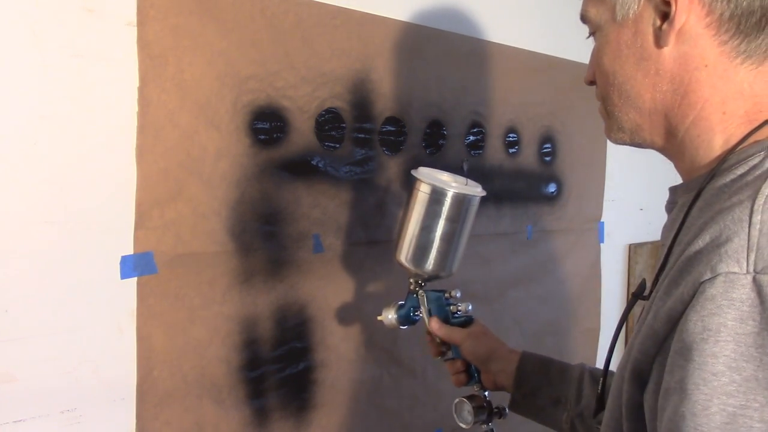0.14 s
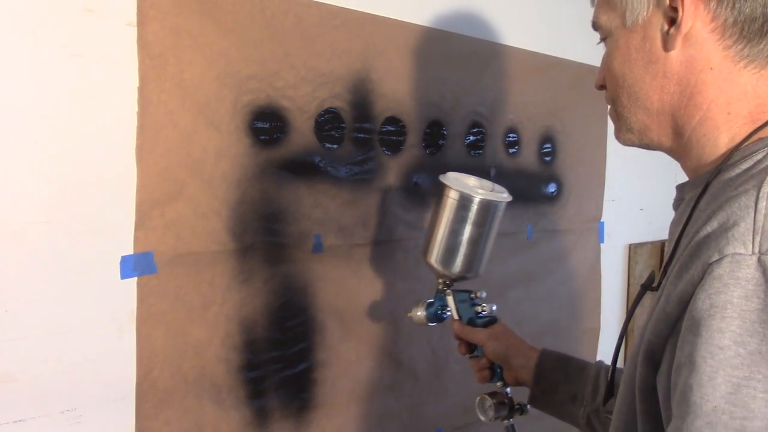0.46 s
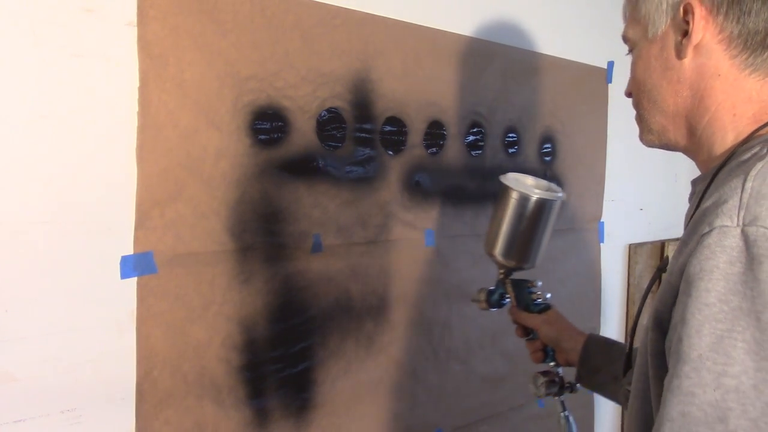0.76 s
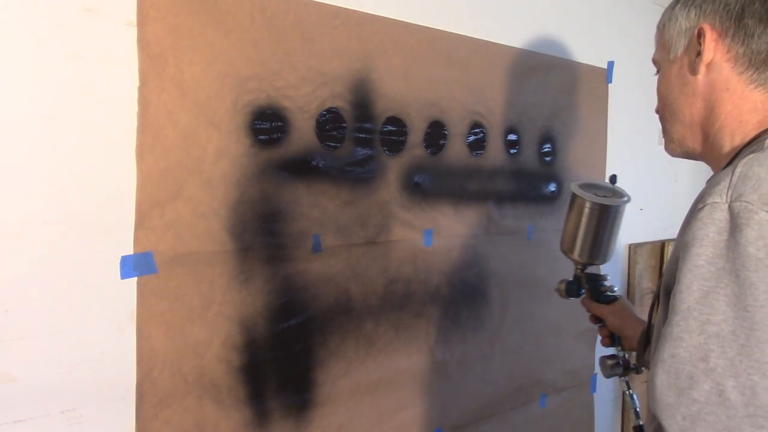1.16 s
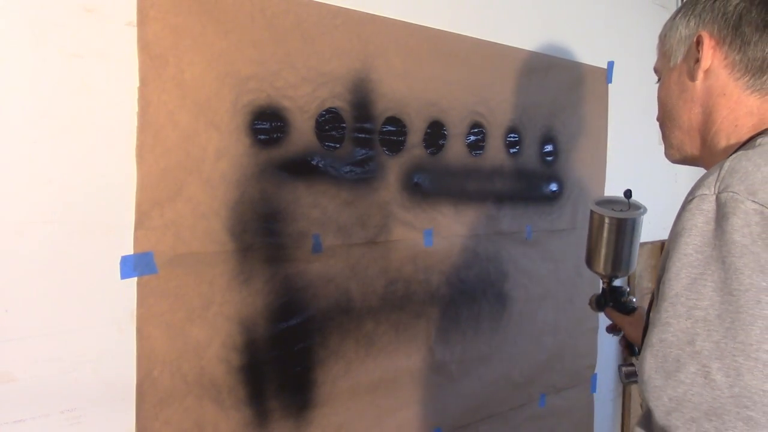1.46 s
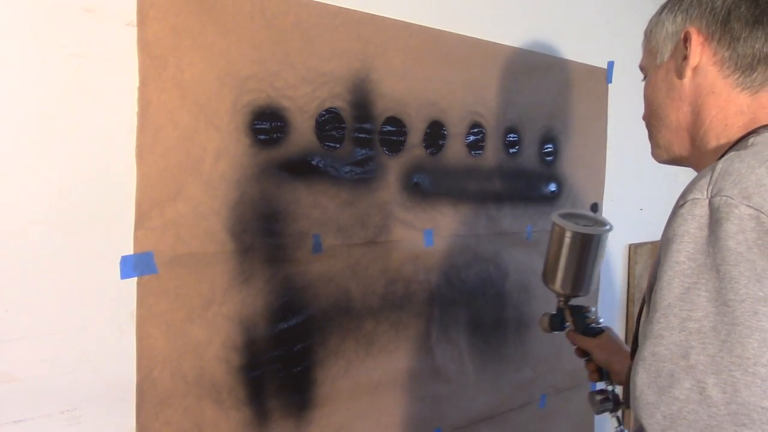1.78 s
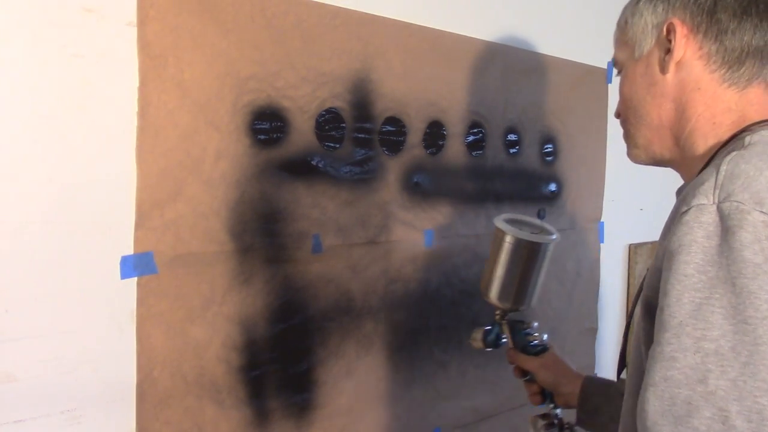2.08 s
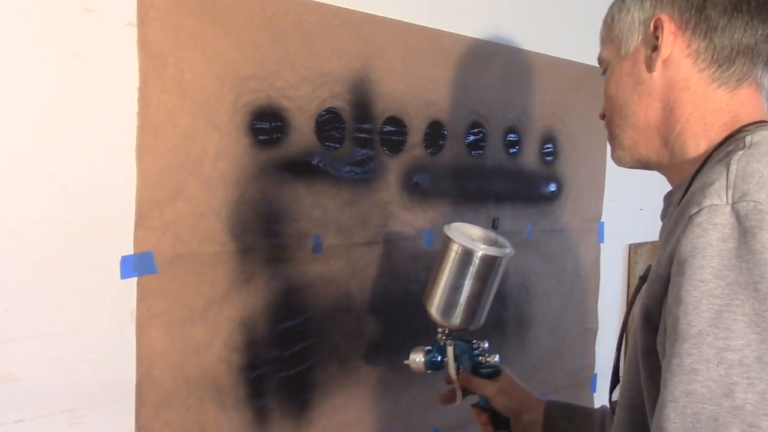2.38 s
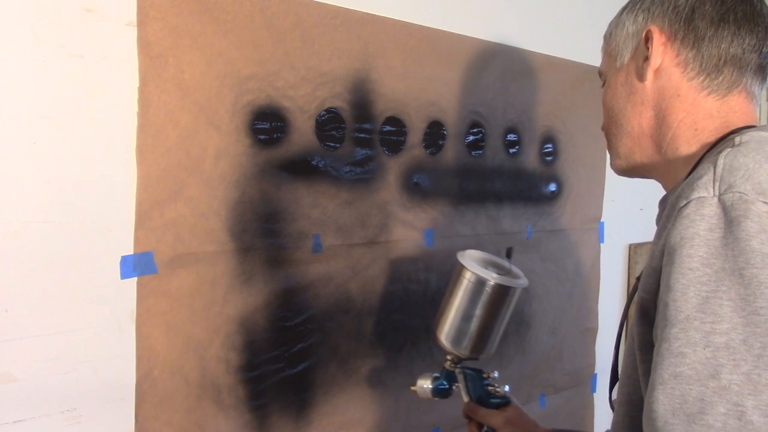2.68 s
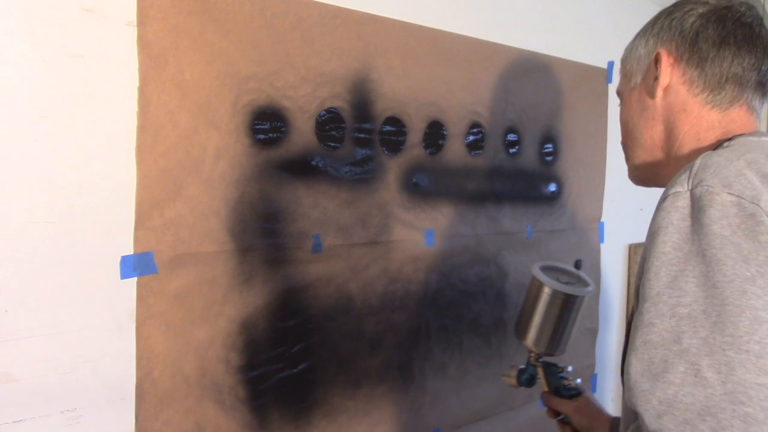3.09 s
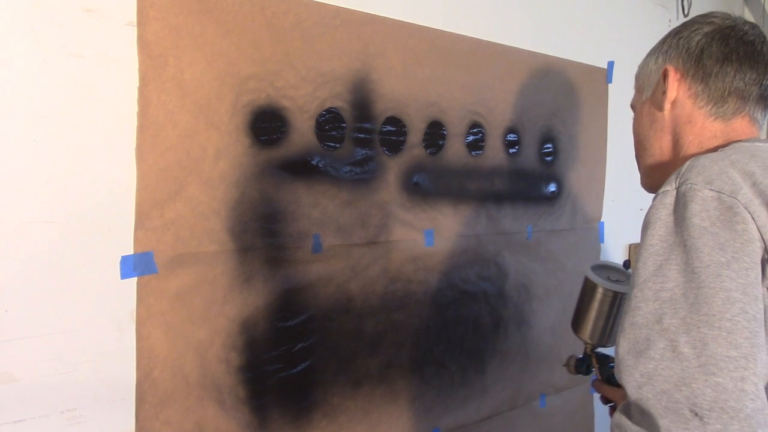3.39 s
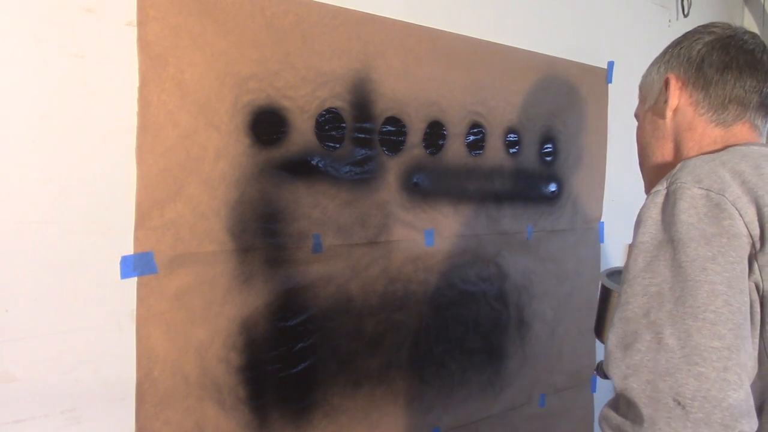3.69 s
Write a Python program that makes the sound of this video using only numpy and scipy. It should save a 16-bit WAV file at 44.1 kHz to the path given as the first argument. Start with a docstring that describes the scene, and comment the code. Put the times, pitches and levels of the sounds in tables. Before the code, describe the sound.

A compressed-air spray gun hisses loudly in three passes with short pauses and trigger clicks.

```python
"""Spray gun in a garage.

A compressed-air gun makes three passes over a paper-covered wall. The trigger clicks, the valve
opens with a spurt of stored air, and the turbulent jet hisses while the paper roars faintly.
The hose thumps dully at each release and at the first two openings; the hiss dies away in the room."""
import sys
import numpy as np
from scipy import signal
from scipy.fft import rfft, irfft
from scipy.io import wavfile
from scipy.ndimage import uniform_filter1d, map_coordinates

SR = 44100
rng = np.random.default_rng(int(sys.argv[2]) if len(sys.argv) > 2 else 0)


def wrap_up_sound(samples):
    """Save the sound to the file named by the first command line argument, as 16-bit audio."""
    columns = np.atleast_2d(samples).T
    # keep every value between -1 and 1, then stretch to whole-number steps
    tamed = np.clip(columns, -1, 1)
    steps = np.round(tamed * 32767).astype(np.int16)
    wavfile.write(sys.argv[1], SR, steps)


N = 169785
TIME = np.arange(N) / SR


def amp(db):
    """Decibels to amplitude ratio."""
    return 10 ** (np.asarray(db) / 20)


def unit_rms(x):
    """Normalisation to rms 1."""
    return x / np.sqrt(np.mean(x ** 2) + 1e-20)


def at_frequency(points, hz):
    """Interpolation on a log-frequency axis."""
    f, value = np.transpose(points)
    return np.interp(np.log(hz + 1), np.log(f + 1), value)


def at_time(points, t, column=1):
    """Linear interpolation in time."""
    columns = np.transpose(points)
    return np.interp(t, columns[0], columns[column])


def colour(x, points):
    """Zero-phase filtering by rows of frequency in Hz and gain in dB."""
    size = 2 * len(x)
    gain = amp(at_frequency(points, np.fft.rfftfreq(size, 1 / SR)))
    return irfft(rfft(x, size) * gain)[:len(x)]


def add(mix, start_s, sound):
    """Superposition of a sound on the mix."""
    part = mix[max(round(start_s * SR), 0):][:len(sound)]
    part += sound[:len(part)]


def resonance(size, hz, half_width_hz):
    """Random excitation of one resonance, rms 1."""
    f = np.fft.rfftfreq(size, 1 / SR)
    response = np.minimum(f / hz, 1) / (1 + ((f - hz) / half_width_hz) ** 2)
    return unit_rms(irfft(rfft(rng.standard_normal(size)) * response, size))


def smooth_field(shape, bins, frames):
    """A moving average correlates noise over frequency and time, rms 1."""
    across_bins = uniform_filter1d(rng.standard_normal(shape), bins, axis=0)
    return unit_rms(uniform_filter1d(across_bins, frames, axis=1))


# Each row: frequency in Hz, relative spectral density in dB.
ROOM_SPECTRUM = [(30, -8), (70, -20), (120, -9.5), (250, -1.5), (400, 0), (700, -6), (1600, -5.5),
                 (3500, -16), (8000, -24), (15000, -31)]
def room_tone(level_db=-49):
    """Stationary noise forms a low, quiet background."""
    return amp(level_db) * unit_rms(colour(rng.standard_normal(N), ROOM_SPECTRUM))


# Each row: frequency in Hz, reverberation time (60 dB of decay) in seconds.
GARAGE_T60 = [(150, 0.53), (400, 1), (1000, 0.76), (3000, 0.87), (6000, 0.63), (10000, 0.46), (15000, 0.36)]
def garage(x, first_s=.005):
    """Reverberation: random reflections decay exponentially, each band at its own rate."""
    taps = rng.choice([-1., 1.], SR) * (rng.random(SR) < .1) * (np.arange(SR) > first_s * SR)
    hz, t, spectra = signal.stft(taps, SR, nperseg=256)
    decay = amp(-60 * t / at_frequency(GARAGE_T60, hz)[:, None])
    tail = signal.istft(spectra * decay, SR, nperseg=256)[1]
    return signal.fftconvolve(x, tail / np.linalg.norm(tail))[:N]


def moving_room(x, tails=4, fades_per_s=10):
    """A room's response depends on source position: the moving gun crossfades between tails."""
    turn = TIME * fades_per_s % tails
    distances = [np.minimum(abs(turn - k), tails - abs(turn - k)) for k in range(tails)]
    return sum(garage(x * np.cos(np.pi / 2 * np.minimum(d, 1))) for d in distances)


# Each row: time in seconds, excess of the path via the wall over the direct path in metres.
WALL_PATH = [(.2, 0.51), (.6, 0.39), (1.2, 0.29), (1.6, 0.32), (2.0, .32), (2.45, 0.406), (2.75, 0.46),
             (3.05, 0.35), (3.6, 0.27)]
def wall_echoes(x, near_gain=.085, far_gain=.094, far_extra_m=.57, sound_m_per_s=343):
    """Comb filtering: the direct sound interferes with two echoes that shift as the gun moves."""
    path = at_time(WALL_PATH, TIME)
    near, far = (map_coordinates(x, [(TIME - metres / sound_m_per_s) * SR], order=3)
                 for metres in (path, path + far_extra_m))
    return x + near_gain * near + far_gain * far


def paper(level_db=-39.5, db_per_m=19, wait_s=.051):
    """Forced vibration: paper roars hollowly once paint lands, swelling and fading as the gun moves."""
    landed = np.minimum(np.minimum(airflow(TIME), airflow(TIME - wait_s)), 1)
    path = at_time(WALL_PATH, TIME)
    gain = amp(level_db + db_per_m * (path - path.mean()))
    return gain * landed * resonance(N, hz=618, half_width_hz=85)


# Each row: start in seconds, peak level in dB, level of the bounce relative to that peak in dB.
HOSE_THUMPS = [(0.213, -29, 1), (1.343, -22.5, 4), (1.563, -32, -1), (2.478, -20, -3), (3.606, -22, 1)]
def hose(band_hz=(115, 350), bounce_s=.0115):
    """Pressure surge: at each listed change of flow a dull pulse runs along the hose, reflected once."""
    band = signal.butter(3, band_hz, "band", fs=SR, output="sos")
    pulse = signal.sosfilt(band, signal.unit_impulse(SR // 10))
    pulse /= abs(pulse).max()
    out = np.zeros(N)
    for start, db, bounce_db in HOSE_THUMPS:
        add(out, start, amp(db) * pulse)
        add(out, start + bounce_s, amp(db + bounce_db) * pulse)
    return out


# Each row: mode frequency in Hz, relative level in dB, time to decay by 60 dB in seconds.
GUN_MODES = [(980, -3, .028), (1250, -8, .02), (1480, -7, .025), (2150, -11, .035), (2480, -4, .06),
             (2680, -4, .04), (4930, -13, .07), (7700, -3, .04), (8900, -5, .05), (14100, -1, .04)]
def gun_ring(t, favoured_hz, smear=.06, favour_db=9, favour_octaves=.3):
    """Damped modes of the metal body, each smeared by loose parts over a share of its pitch."""
    out = np.zeros(len(t))
    for hz, db, t60 in GUN_MODES:
        boost_db = favour_db * np.exp(-(np.log2(hz / favoured_hz) / favour_octaves) ** 2)
        out += amp(db + boost_db - 60 * t / t60) * resonance(len(t), hz, smear * hz)
    return out


# Each row: start in seconds, rms level of the first 5 ms in dB, frequency the blow favours in Hz.
TRIGGER_CLICKS = [(1.510, -18.5, 1050), (1.520, -26, 14000), (2.474, -16, 2550), (2.621, -16, 2550),
                  (3.810, -22, 1030)]
def trigger(snap_db=5, snap_s=.004, snap_hz=700, ring_db=-48, ring_age_s=.06, ring_t60_s=.2):
    """Impact excitation: the trigger snaps against the valve stem and rings the gun."""
    t, out = np.arange(0, .3, 1 / SR), np.zeros(N)
    highpass = signal.butter(2, snap_hz, "high", fs=SR, output="sos")
    for start, db, hz in TRIGGER_CLICKS:
        snap = signal.sosfilt(highpass, rng.standard_normal(len(t)))
        click = gun_ring(t, hz) + amp(snap_db) * np.exp(-t / snap_s) * snap
        add(out, start, amp(db) * click / np.std(click[t < .005]))
    # At first the gun still rings from an earlier knock.
    ring = unit_rms(gun_ring(np.full(len(t), ring_age_s), favoured_hz=3400, smear=.03))
    add(out, 0, amp(ring_db - 60 * t / ring_t60_s) * ring)
    return out


OPEN_S = .008  # rise time of the flow
# Each row: time the valve opens in seconds, time it shuts in seconds.
PASSES = [(.213, 1.336), (1.555, 2.468), (2.652, 3.598)]
def airflow(t, bleed_s=.02):
    """Valve flow rises fast, holds, then decays exponentially as the air bleeds off."""
    return sum(np.clip((t - start) / OPEN_S, 0, 1) ** 2 * np.exp(-np.maximum(t - stop, 0) / bleed_s)
               for start, stop in PASSES)


def spurt(level_db=-9, length_s=.018):
    """Transient discharge: pressure stored in the hose escapes in a bright blast as the valve opens."""
    t, out = np.arange(0, .06, 1 / SR), np.zeros(N)
    envelope = np.minimum(t / OPEN_S, 1) ** 2 / (1 + (t / length_s) ** 6)
    for start, _ in PASSES:
        add(out, start, amp(level_db) * envelope * resonance(len(t), hz=9000, half_width_hz=3500))
    return out


# Each row: frequency in Hz, relative spectral density in dB.
JET_SPECTRUM = [(30, -30), (80, -28), (170, -18.5), (300, -13), (440, -12.5), (610, -11), (950, -9.7),
                (1800, -5.7), (2500, -5.2), (3400, -1.6), (4400, -1.9), (5600, 0), (7000, 0), (8500, 2.2),
                (10000, -.5), (12000, -3.4), (13500, -2.6), (16000, -4)]
# Each row: time in seconds, level of the air cap's faint singing before the sway in dB.
CAP_SINGING = [(.22, -18), (.58, -35), (.72, -12.5), (1.0, -37), (1.9, -16), (2.06, -16), (2.17, -17),
               (2.28, -37), (2.45, -20), (3.6, -23)]
# The jet sways as the gun moves. Each row: time in seconds, gain in dB, tilt near 13.6 kHz in dB.
JET_SWAY = [(.22, -1.5, -0.1), (.45, -4.5, 2.3), (.72, -2.7, 0), (1.0, -4.5, 1), (1.3, -2.1, -2.5),
            (1.58, -1.4, -1.5), (1.8, -4.5, 0), (2.1, -2.6, -0.5), (2.45, -5.2, 0.5), (2.8, -1.6, -3.8),
            (3.15, -5.1, 4), (3.35, -4, 0.5), (3.6, -3.5, -2)]
def jet(base_db=-8.5, patch_db=.9, drift_db=.26, flutter_db=.81):
    """Turbulence radiates a broadband, fluctuating hiss, and the air cap resonates with it."""
    hz, t, spectra = signal.stft(rng.standard_normal(N), SR, nperseg=256)
    eddies = patch_db * smooth_field(spectra.shape, bins=5, frames=6)
    eddies += drift_db * smooth_field(spectra.shape, bins=3, frames=60)
    flutter = flutter_db * smooth_field((1, len(t)), bins=1, frames=6)
    treble = np.minimum(hz / 9600, 2)[:, None] ** 2 * at_time(JET_SWAY, t, column=2) / 2
    turbulence = signal.istft(spectra * amp(treble + eddies + flutter), SR)[1][:N]
    hiss = amp(base_db) * unit_rms(colour(turbulence, JET_SPECTRUM))
    cap = amp(at_time(CAP_SINGING, TIME)) * resonance(N, hz=7750, half_width_hz=850)
    return (hiss + cap) * amp(at_time(JET_SWAY, TIME)) * airflow(TIME)


# Each row: frequency in Hz, gain of the side (left minus right) signal in dB.
STEREO_WIDTH = [(30, -22), (70, -13), (280, -12.5), (550, -15), (1100, -34), (2200, -66.5), (4500, -31.5),
                (8500, -11), (13000, -14)]
def scene():
    """Mid-side stereo: two close microphones share the direct sound and differ in the diffuse field."""
    air = wall_echoes(jet()) + spurt() + paper()
    thumps, clicks = hose(), trigger()
    into_room = amp(-4.5) * air + amp(-6) * thumps + amp(-5) * clicks
    mid_tone, side_tone = room_tone(), room_tone()
    mid = air + thumps + clicks + moving_room(into_room) + mid_tone
    side = colour(moving_room(into_room) + side_tone, STEREO_WIDTH)
    return np.array([mid + side, mid - side])


def record(dry, limit_db=-10, recover_db_per_s=65, lag_s=.012, cutoff_hz=15920):
    """Dynamic compression: a quick limiter holds the hiss down, then soft clipping and a low-pass."""
    power_db = 10 * np.log10(abs(uniform_filter1d((dry ** 2).mean(0), size=200)) + 1e-12)
    recovery_db = TIME * recover_db_per_s
    peak_db = np.maximum.accumulate(power_db + recovery_db) - recovery_db
    over_db = np.maximum(peak_db - limit_db, 0)
    pole = np.exp(-1 / (lag_s * SR))
    held = dry / amp(signal.lfilter([1 - pole], [1, -pole], over_db))
    rounded = held / (1 + held ** 8) ** (1 / 8)
    lowpass = signal.firwin(1023, cutoff_hz, window=("kaiser", 9), fs=SR)
    return signal.oaconvolve(rounded, lowpass[None], "same")


dry = scene()
out = record(dry)
wrap_up_sound(out)
```